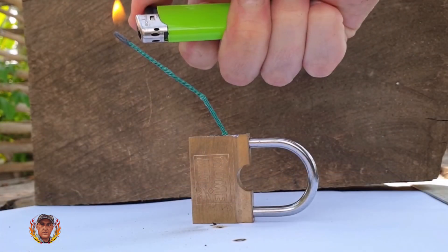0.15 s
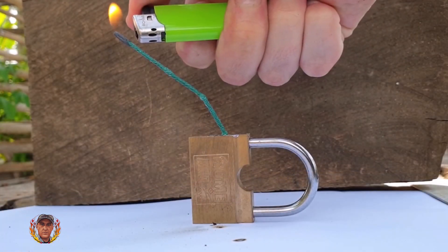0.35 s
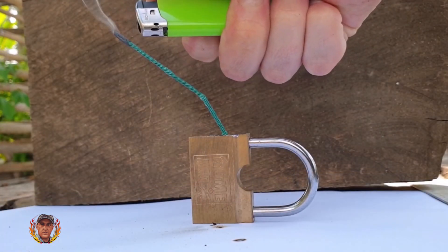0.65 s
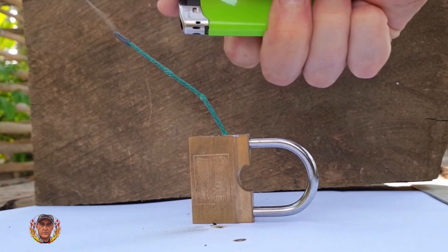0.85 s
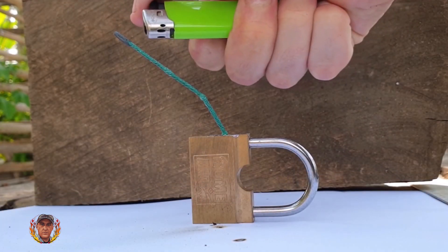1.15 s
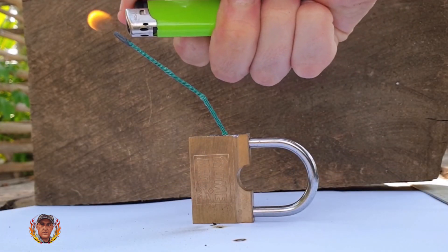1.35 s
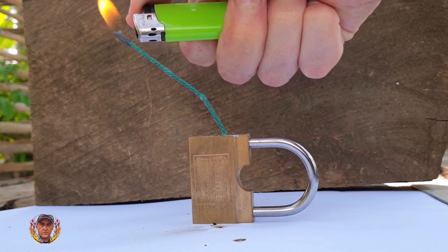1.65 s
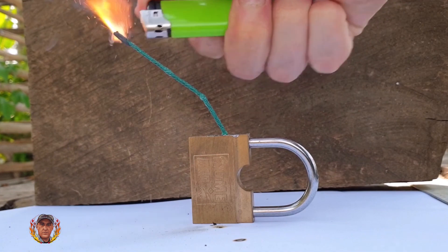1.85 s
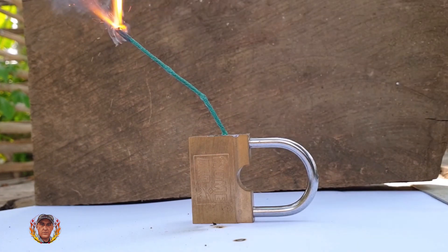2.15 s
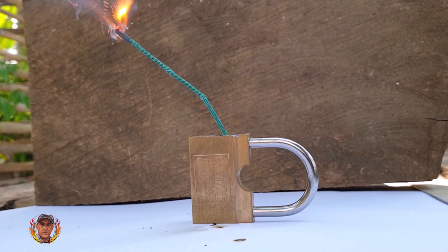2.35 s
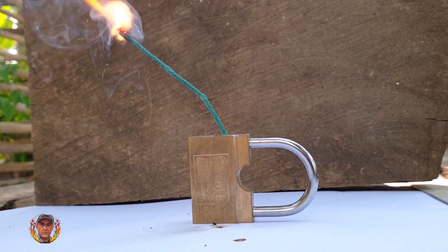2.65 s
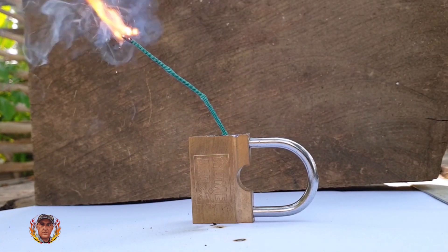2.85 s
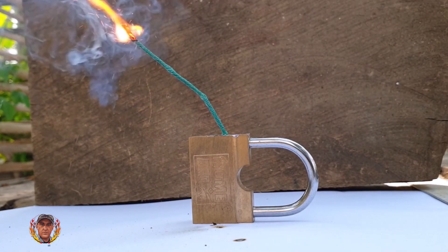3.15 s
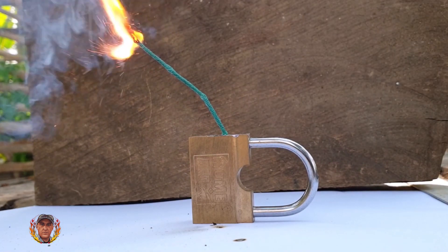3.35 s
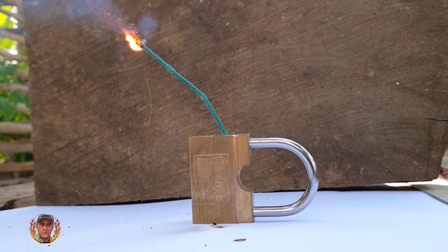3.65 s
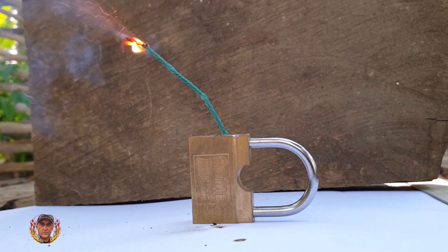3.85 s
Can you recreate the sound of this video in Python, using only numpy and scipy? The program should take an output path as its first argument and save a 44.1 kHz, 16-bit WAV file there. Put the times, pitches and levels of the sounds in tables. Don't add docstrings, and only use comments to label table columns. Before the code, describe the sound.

Burning fuse hisses and sputters close by, preceded by crisp plastic lighter clicks over low rumble.

```python
import sys
import numpy as np
from scipy import signal
from scipy.fft import rfft, irfft
from scipy.io import wavfile
from scipy.ndimage import uniform_filter1d

SR = 44100
rng = np.random.default_rng(int(sys.argv[2]) if len(sys.argv) > 2 else 0)


def boost(x):
    u = np.asarray(x, float) / 20
    return 10 ** u


def to_wav(s):
    ch = np.atleast_2d(s).T
    pcm = np.round(np.clip(ch, -1, 1) * 32767)
    wavfile.write(sys.argv[1], SR, pcm.astype(np.int16))


N = 176400
T = np.arange(N) / SR
HZ = np.arange(N // 2 + 1) * SR / N + 1e-3

# start_s, peak_db, rattle_s, knocks
LIGHTER_CLICKS = [
    (.5726, -14, .0005, 3),
    (1.0245, -41, .0008, 2),
    (1.1283, -10.5, .0008, 3),
    (1.8937, -11.5, .0026, 6),
]


def unit(x):
    return x / np.sqrt(np.mean(x ** 2))


def colour(table):
    f, db = np.array(table).T
    points_hz = np.r_[f[0] / 2, f, f[-1] * 2]
    points_db = np.r_[db[0] - 20, db, db[-1] - 20]
    return boost(np.interp(np.log(HZ), np.log(points_hz), points_db))


def bell(hz, width):
    return np.exp(-.5 * ((HZ - hz) / (width / 2)) ** 2)


def walk(rate):
    k = int(SR / rate)
    levels = rng.standard_normal(N // 40)[:N // k + 2]
    held = np.repeat(levels, k)[:N + k]
    return 0.87 * uniform_filter1d(uniform_filter1d(held, k), k)[:N]


def ring(knocks, hz, t60):
    r = np.exp(-np.log(1000) / (t60 * SR))
    w = 2 * np.pi * hz / SR
    return signal.lfilter([np.sin(w)], [1, -2 * r * np.cos(w), r * r], knocks)


def add(out, s, sound, db):
    i = int(s * SR)
    out[i:i + len(sound)] += (sound * boost(db) / np.abs(sound).max())[:N - i]


def ports():
    # centre_hz, width_hz, gain_db
    left_port = [(900, 255, -6.5), (1280, 1300, 4.5), (4730, 1100, 0.5), (7380, 280, -1), (9280, 260, 7),
                 (10560, 2800, 6), (12610, 1100, 0), (14200, 410, -7.5)]
    right_port = [(1100, 1100, -2), (1990, 980, 4.5), (3930, 490, 1), (5060, 100, -0.5), (8300, 330, -11),
                  (9300, 670, -6.5), (12200, 1300, -0.5), (14900, 330, -12.5)]
    gains_db = [sum(g * bell(hz, w) for hz, w, g in port) for port in (left_port, right_port)]
    cepstrum = irfft(np.log(boost(np.array(gains_db))), N)
    cepstrum[:, 1:N // 2] *= 2
    cepstrum[:, N // 2 + 1:] = 0
    return np.exp(rfft(cepstrum))


def traffic():
    # freq_hz, density_db
    rumble_curve = [(25, -35.5), (42, -1.5), (110, -4), (160, -11), (300, -20), (700, -33.5), (1300, -43.5),
                    (3000, -49.5)]
    # centre_hz, width_hz, level_db
    drone_lines = [(82.6, 2.4, 2), (101, 18, -11.5), (125.25, 7.5, -4), (203.1, 1.6, -11),
                   (140.5, 15, -17.5)]
    # time_s, level_db
    traffic_swell = [(0.0, -53), (0.23, -51), (1.05, -47.5), (1.14, -47.5), (1.169, -46.5), (1.54, -44),
                     (2.35, -48.5), (3.9, -46), (4.0, -47)]
    gain = colour(rumble_curve) + sum(boost(db + 8) * bell(hz, w) for hz, w, db in drone_lines)
    mid, side = (rfft(rng.standard_normal(N)) * gain for _ in range(2))
    side = side * np.clip(HZ / 700, .22, 1)
    pair = irfft(np.array([mid + side, mid - side]), N)
    t, db = np.array(traffic_swell).T
    balance_db = np.array([[1.2], [-1.2]])
    return unit(pair) * boost(np.interp(T, t, db) + balance_db)


def microphone_hiss():
    # freq_hz, density_db
    hiss_curve = [(300, -17.5), (2000, -8.5), (5000, -2), (8000, -8.5), (9200, 4), (11200, 3),
                  (12300, -3.5), (16000, -4.5)]
    noise = irfft(rfft(rng.standard_normal((2, N))) * colour(hiss_curve), N)
    return unit(noise) * boost(-80)


def rustles():
    # start_s, length_s, level_db, centre_hz, width_hz
    rubs = [
        (.94, .19, -82, 2400, 1500),
        (1.02, .1, -80, 9000, 9000),
        (1.25, .11, -76.5, 4000, 1100),
        (1.26, .05, -83, 4900, 400),
        (1.48, .12, -81, 1730, 70),
        (.7, .07, -83, 2200, 1500),
        (1.1, .7, -83, 5000, 7000),
        (.4, 1.4, -79, 800, 600),
        (3.86, .1, -59, 1500, 900),
    ]
    out = 0
    for s, length, db, hz, width in rubs:
        grains = rng.standard_normal((2, N)) * boost(3.0 * walk(140))
        resonance = 1 / (1 + ((HZ - hz) / (width / 2)) ** 2)
        rub = unit(irfft(rfft(grains) * resonance, N))
        swell = np.sin(np.pi * np.clip((T - s) / length, 0, 1))
        out = out + rub * boost(db) * swell
    return out


def pops():
    # start_s, peak_db, pitch_hz, ring_t60_s
    pop_events = [(0.533, -66, 3000, .004), (0.5565, -57, 10000, .002), (0.539, -62, 2490, .004),
                  (0.556, -56.5, 2143, 0.0043), (0.724, -58.5, 2140, 0.012), (0.95, -58.5, 2500, 0.015),
                  (1.082, -55, 2660, 0.03), (1.0205, -56.5, 9210, 0.0022), (1.059, -59, 9500, .002),
                  (1.094, -62, 8500, 0.0016), (1.095, -60.5, 2700, 0.01), (2.156, -36, 900, 0.013),
                  (2.7112, -29.5, 2120, 0.0044), (2.712, -37, 1050, 0.007), (2.83, -39.5, 1400, 0.0094),
                  (2.755, -32.5, 1430, 0.0054), (2.782, -36.5, 1100, 0.012), (3.7245, -40, 1150, 0.03),
                  (3.728, -31, 1160, 0.028), (3.734, -29, 990, 0.0092), (3.7495, -27.5, 2750, 0.0091),
                  (3.7684, -24, 1630, 0.015), (3.769, -15, 2470, 0.0067), (3.7692, -32.5, 3100, .008),
                  (3.7819, -25.5, 1780, 0.0078), (3.786, -26.5, 2550, 0.0064), (3.806, -22.5, 1167, 0.025),
                  (3.8062, -36, 664, 0.0086), (3.81, -29, 1150, 0.017), (3.832, -31, 1100, .015),
                  (3.846, -38, 1200, 0.013), (3.879, -38, 1310, 0.045), (3.904, -36, 1630, 0.043),
                  (3.924, -35, 1610, .015)]
    out = np.zeros(N)
    for s, db, hz, t60 in pop_events:
        snap = rng.standard_normal(2048) * np.exp(-T[:2048] / 0.0019) * 0.066
        snap[0] = -1
        burst = ring(snap, hz, t60) + boost(9.0) * ring(snap, 1.2 * hz, .002)
        add(out, s, burst, db)
    return out


def lighter():
    # mode_hz, level_db, t60_s
    release_modes = [(970, -18.5, 0.0023), (2184, -14.5, .005), (2870, -18.5, 0.004), (4200, -18, .004),
                     (5860, -6.5, 0.0051), (6810, -8, .007), (9500, -6, 0.0045), (10100, -1.5, 0.0052),
                     (11170, -4, 0.0065), (12600, -10, .006), (14500, -3.5, .005), (16200, -16, .004)]
    thumb_modes = [(1990, -13, .005), (3960, -7, .003), (5230, 2.5, .004), (6400, -8, .004),
                   (8370, -1, .004), (9500, -3, .006), (10500, -4, 0.0085), (11230, -6.5, .006),
                   (13100, -7, .006), (15200, -11, .004)]
    press_modes = [(2325, -1.5, 0.0059), (2390, -22, .025), (3820, -7, 0.0037), (5060, -11.5, 0.0063),
                   (5900, -4, .006), (7100, -9, .006), (8830, -2, 0.0067), (10320, -4, .006),
                   (11300, -5.5, .005), (13220, -10.5, 0.0034), (12700, -14, 0.0067),
                   (14270, -14.5, 0.0036), (15760, -13, .005)]
    let_go_modes = [(715, -19, 0.0028), (1400, -10, 0.0027), (2360, 0.5, 0.0024), (3360, -1, 0.0018),
                    (5370, -1, 0.003), (6140, -4, 0.0044), (7020, -2, 0.0037), (8775, 3, 0.0032),
                    (9810, -3, 0.0035), (10580, 0.5, 0.0038), (11800, -1.5, 0.005), (12700, 0, 0.003),
                    (13430, -2, 0.0044), (15400, -6, .004)]
    grips = (release_modes, thumb_modes, press_modes, let_go_modes)
    out, t = np.zeros(N), T[:2048]
    for (s, db, length, count), modes in zip(LIGHTER_CLICKS, grips):
        count = round(count)
        at = (np.arange(count) / count * length * SR).astype(int)
        bare_crack = np.diff(rng.standard_normal(2049)) * np.exp(-t / length)
        sound = boost(-17) * bare_crack
        chance = rng.random((14, 12))
        for (hz, mode_db, t60), row in zip(modes, chance):
            knocks = np.zeros(2048)
            knocks[at] = 0.3 + row[:len(at)]
            swell = signal.lfilter([1], [1, -boost(-60 / (t60 * SR))], knocks)
            sound = sound + boost(mode_db) * swell * np.sin(2 * np.pi * (hz * t + row[-1]))
        add(out, s, sound, db)
    return out


def click_cracks():
    cracks = np.zeros(N)
    for s, db, _, _ in LIGHTER_CLICKS:
        cracks[int(s * SR)] = boost(db + 13)
    return cracks


def fuse():
    # time_s, low_flutter_db, flame_roar_db, gas_jet_db
    burn = [(1.697, -60, -75.5, -75), (1.742, -61, -54, -54.5), (1.78, -47.5, -50.5, -51.5),
            (1.84, -47.5, -51, -55), (1.93, -51.5, -50.5, -50), (2.0, -50, -45.5, -47),
            (2.06, -52, -52, -49), (2.32, -51.5, -52, -50.5), (2.53, -52, -52, -53),
            (2.61, -55, -58.5, -56.5), (2.75, -49.5, -52, -55), (3.02, -54.5, -58, -51.5),
            (3.25, -58.5, -58, -52), (3.47, -60.5, -60, -55.5), (3.62, -56.5, -52.5, -50.5),
            (3.7, -54, -54, -55.5), (3.9, -53, -46.5, -47.5), (4.0, -54.5, -53, -51)]
    # freq_hz, density_db
    roar_curve = [(150, -4), (300, -4), (600, -4), (900, -10.5), (1400, -7), (2500, -9), (4200, -7.5),
                  (7000, -22)]
    jet_curve = [(3000, -21), (5600, 1.5), (8000, -7), (9300, -2), (11500, 0.5), (13500, -1), (15300, 5.5),
                 (16500, -14)]
    # centre_hz, width_hz, gain_db
    burn_notches = [(2450, 400, -2.5), (3520, 136, -4.5), (4750, 130, -8), (6380, 280, -2.5),
                    (7480, 250, -5), (8360, 260, -5), (4980, 120, -9.5), (10000, 450, -3),
                    (13700, 1100, 1.5)]
    # freq_hz, unshared_db
    apart_curve = [(200, -5), (600, -6.5), (1000, 11), (5000, 5.5), (13000, 13), (14500, 22), (15300, -7),
                   (17000, -11)]
    control_hz = (500, 1100, 5000, 8500)
    lag_s, grit_db, flicker_db, wander_db = -.0002, 2, 2, 0.3

    t, flutter_db, roar_db, jet_db = np.array(burn).T
    sparks = boost(grit_db * walk(500))
    both, left, right = rfft(rng.standard_normal((3, N)) * sparks)
    apart = colour(apart_curve)
    lagged = both * np.exp(-2j * np.pi * HZ * lag_s)
    pair = np.array([lagged + apart * left, both + apart * right]) / np.hypot(1, apart)
    notch_db = sum(g * bell(hz, w) for hz, w, g in burn_notches)
    shape = np.hypot(colour(roar_curve), boost(-11.5) * colour(jet_curve)) * boost(notch_db)
    spec = pair * shape * ports()

    out, shared = 0, walk(1.9)
    for octave in np.arange(6.5, 14.6, .5):
        share = np.cos(np.pi * np.clip(np.log2(HZ) - octave, -.5, .5)) ** 2
        shared = 1.057 * shared + .5 * walk(3.37)
        low = np.interp(octave, np.log2(control_hz), (1, 0, 0, 0))
        high = np.interp(octave, np.log2(control_hz), (0, 0, 0, 1))
        band_db = low * flutter_db + high * jet_db + (1 - low - high) * roar_db
        db = np.interp(T, t, band_db) + wander_db * shared + flicker_db * walk(24.91)
        out = out + irfft(spec * share, N) * boost(db)
    catch = np.clip((T - t[0]) / 0.01, 0, 1)
    return out * catch * boost(17.5)


def diffuse_echo(t60):
    t = T[:SR // 2]
    tail = rng.standard_normal(len(t)) * boost(-60 * t / t60) * (t > .0015)
    return rfft(unit(tail) / np.sqrt(len(t)), N)


def heard(x, pan_db, lag_s, crack):
    early_db, early_t60_s = -13, .03
    late_db, late_t60_s = -23, 0.37
    out = []
    for shape, lag, db in zip(ports(), (lag_s, 0), (pan_db / 2, -pan_db / 2)):
        direct = np.exp(-2j * np.pi * HZ * lag)
        near = rfft(x) * (direct + boost(early_db) * diffuse_echo(early_t60_s))
        tail = rfft(crack) * boost(late_db) * diffuse_echo(late_t60_s) * np.clip(HZ / 1500, 0, 1)
        out.append(irfft((near + tail) * np.sqrt(shape) * boost(db), N))
    return np.array(out)


def scene():
    clicks = irfft(rfft(lighter()) * np.clip(HZ / 900, .12, 1), N) * boost(2)
    sputter = irfft(rfft(pops()) * np.clip(HZ / 600, 0, 1) ** 2, N)
    near = heard(clicks, 2.0, -.000025, click_cracks()) + heard(sputter, -.6, .00007, sputter)
    pan = boost(np.array([[.6], [-.6]]))
    steady = (fuse() + boost(4.5) * rustles()) * pan + traffic() + microphone_hiss()
    top = signal.ellip(12, .2, 60, 15760, fs=SR, output="sos")
    return signal.sosfilt(top, steady) + near


def band_limit(x):
    return signal.sosfilt(signal.butter(12, 16970, fs=SR, output="sos"), x)


def record(dry):
    top = signal.cheby1(8, .5, 16000, fs=SR, output="sos")
    return band_limit(signal.sosfilt(top, dry))


dry = scene()
out = record(dry)
to_wav(out)
```